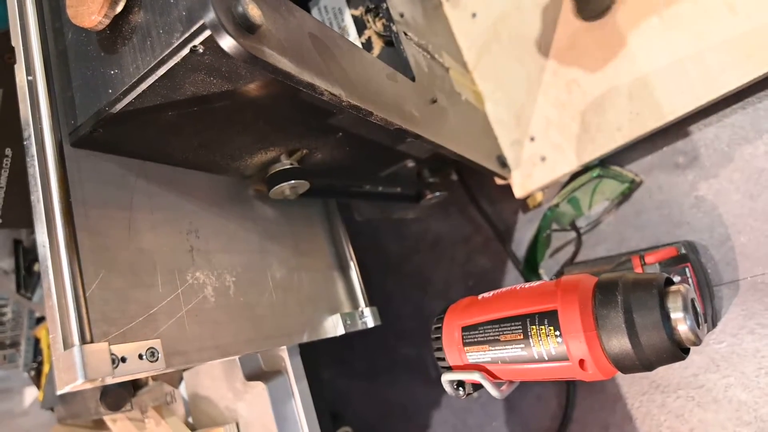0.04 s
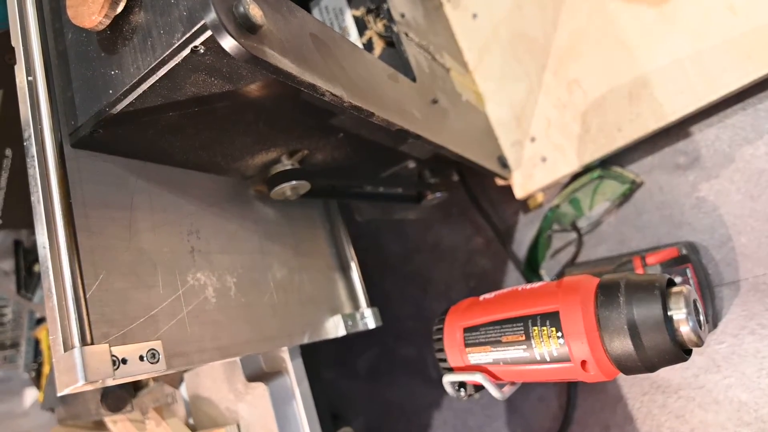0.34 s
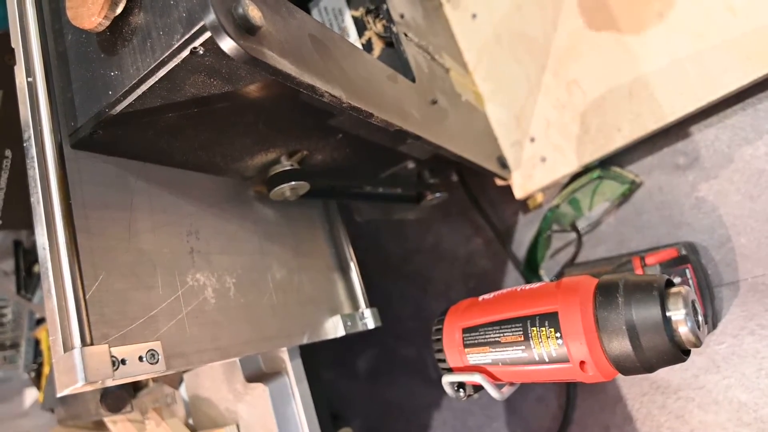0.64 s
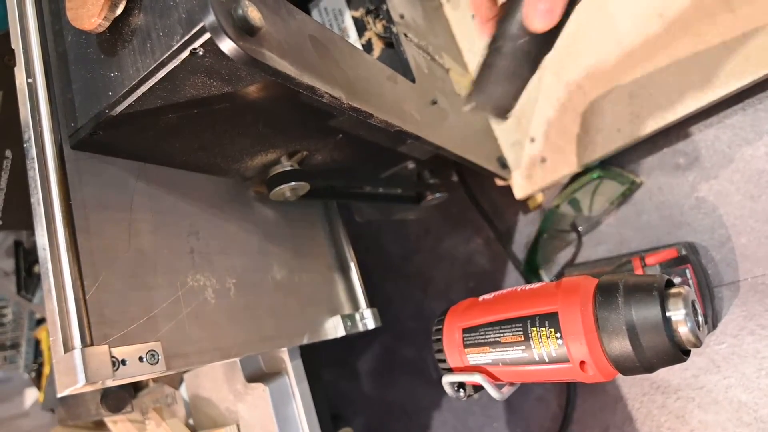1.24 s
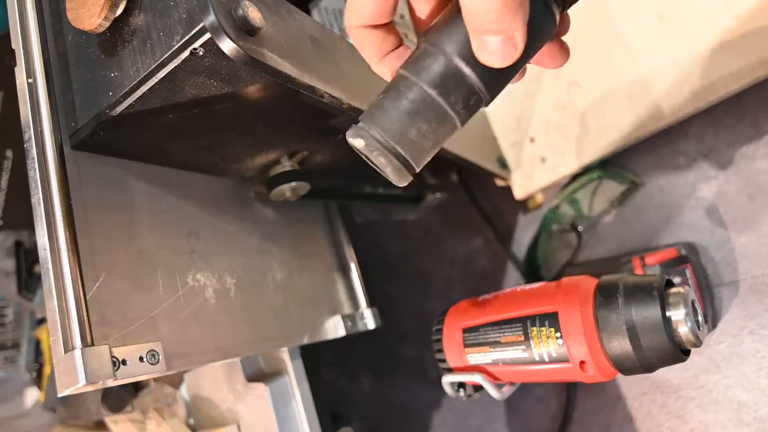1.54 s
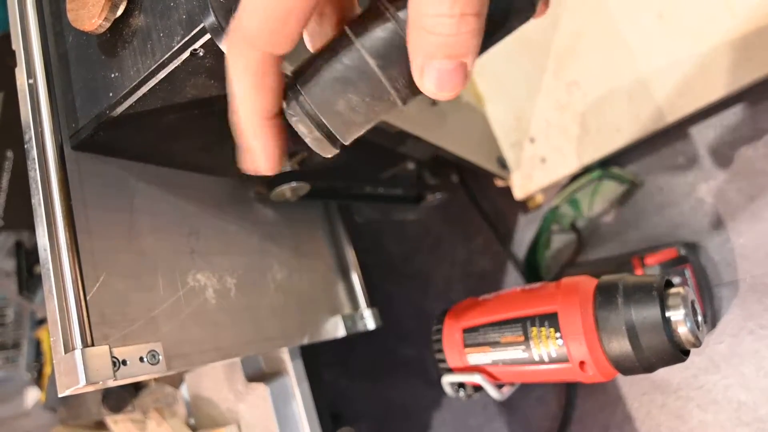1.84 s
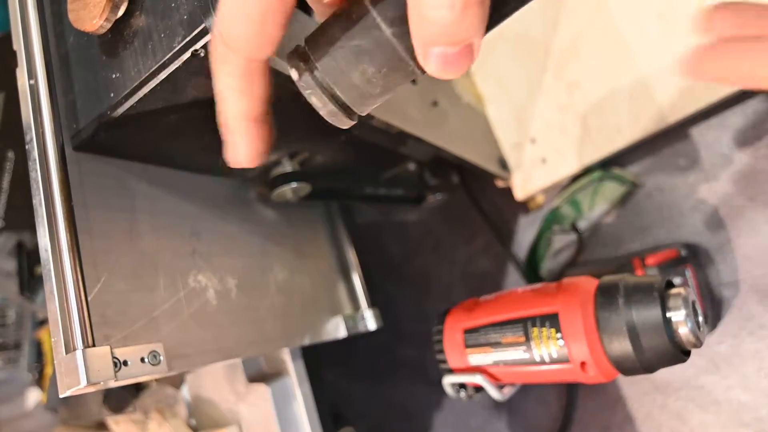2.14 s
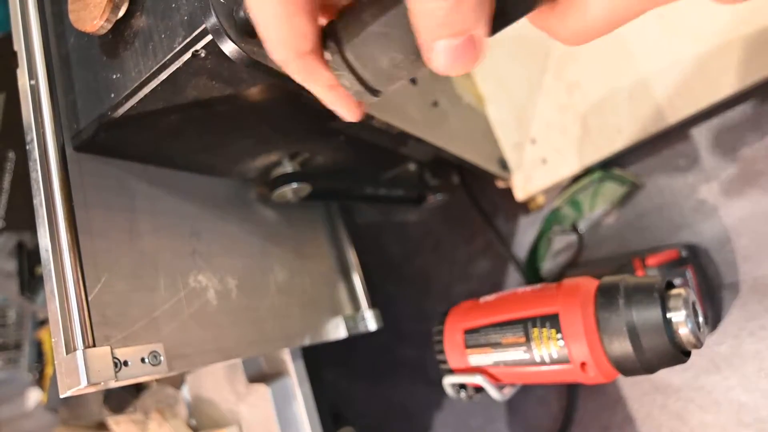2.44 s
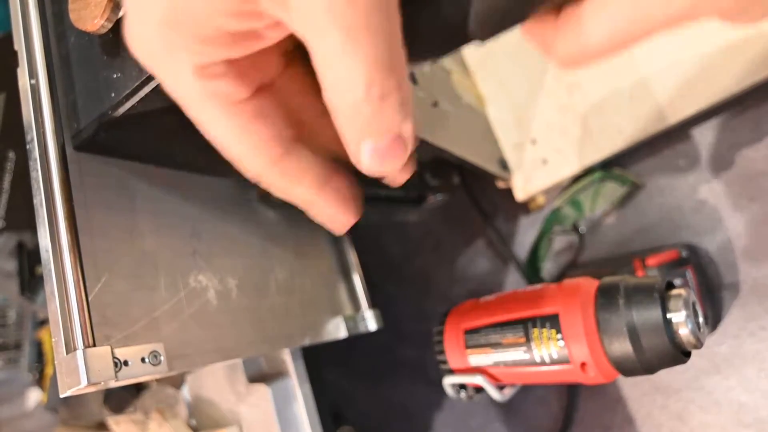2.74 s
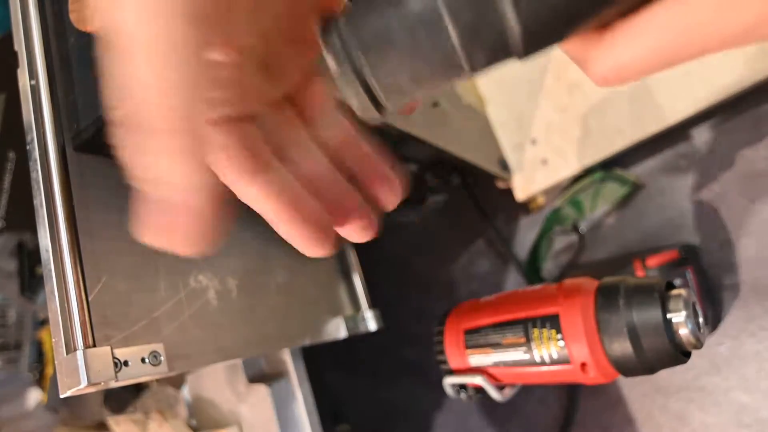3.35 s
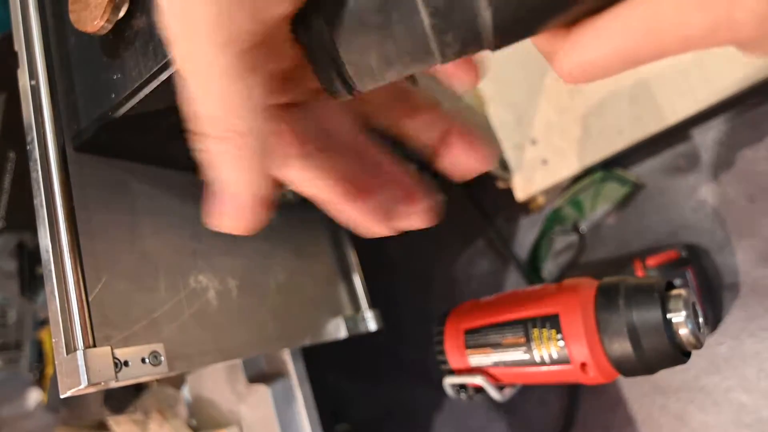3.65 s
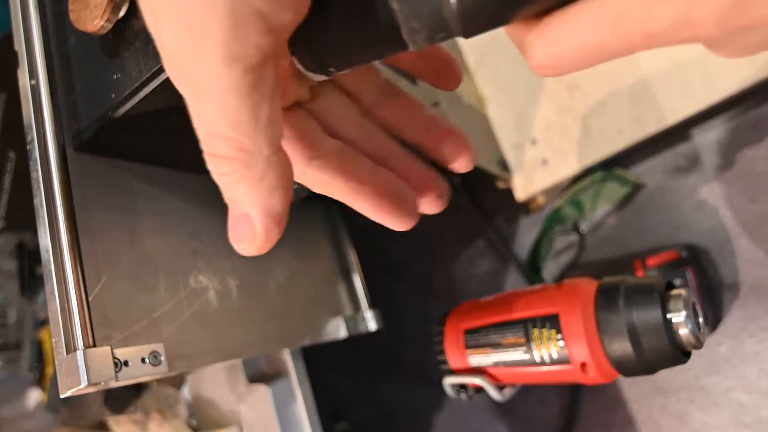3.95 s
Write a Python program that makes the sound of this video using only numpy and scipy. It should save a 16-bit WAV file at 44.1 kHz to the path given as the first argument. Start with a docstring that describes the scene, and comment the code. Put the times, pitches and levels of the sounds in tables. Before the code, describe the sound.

A dust extractor hose sucks air with a hollow rush over a faint machine drone. From about 0.6 seconds a thin, breathy whistle joins, and the rush shifts in tone as the nozzle comes closer. From 2 seconds fingers thin it to a hiss, nearly stopping it at 2.8. Until 4 seconds a palm chokes and frees it in quick bursts, with a few soft gusts on the microphone.

```python
"""A dust extractor sucks air through its hose nozzle: a hollow roar, with the machine droning faintly.
From about 0.6 s the air whistles at the rim, the nozzle is lifted and gusts start to buffet the
microphone. By 1.6 s the nozzle hangs over a steel table, whose echo colours the rush; then it comes close.
Fingers, then a palm, choke and free the opening: the roar thins to a hiss, nearly stops and bursts back."""
import sys
import numpy as np
from scipy import signal
from scipy.fft import rfft, irfft
from scipy.io import wavfile
from scipy.ndimage import map_coordinates

SR = 44100
rng = np.random.default_rng(int(sys.argv[2]) if len(sys.argv) > 2 else 0)


def waveform_to_disk(signal):
    """Save audio, clipped to [-1, 1], as 16-bit WAV at the path in sys.argv[1]."""
    frames = np.transpose(np.atleast_2d(signal))
    scaled = np.clip(frames, -1, 1) * 32767
    samples = np.round(scaled).astype(np.int16)
    wavfile.write(sys.argv[1], SR, samples)


N = 176400
T = np.arange(N) / SR
HZ = np.maximum(np.arange(N // 2 + 1) * SR / N, 1)

# how loud the rushing air is in four bands: t/s, bass/dB, middle/dB, treble/dB, top/dB
AIR_LEVELS = [(0.0, -38, -33, -25, -30), (0.12, -45.5, -33, -26, -33), (0.38, -42, -33.5, -28.5, -33),
              (0.54, -40.5, -33.5, -28, -29.5), (0.6, -41, -34.5, -38.5, -40),
              (0.73, -34.5, -34.5, -31, -36.5), (0.875, -33.5, -26.5, -30, -38),
              (0.895, -27.5, -23, -23.5, -31.5), (0.96, -39.5, -30, -28.0, -31),
              (1.04, -36, -31.5, -26, -27.5), (1.1, -38, -34, -34.5, -39), (1.3, -35, -31, -32.5, -35.5),
              (1.68, -33.5, -26, -31.5, -33), (1.858, -32, -27, -31, -37),
              (1.899, -34.5, -27.5, -27.5, -24.5), (1.98, -39.5, -38, -28.0, -32),
              (2.08, -39, -41, -29.5, -27), (2.114, -39, -30, -25.5, -29), (2.135, -45, -39.5, -40, -37),
              (2.185, -41.5, -36.0, -35.5, -43), (2.224, -35, -33, -31, -26.5),
              (2.251, -45, -34, -23.5, -24), (2.285, -68, -50.5, -39.5, -36), (2.37, -62, -48, -33, -26),
              (2.485, -51, -46, -31, -28), (2.508, -43, -29.5, -25.5, -24.5),
              (2.535, -51.0, -41.5, -35.5, -44), (2.59, -47, -36.5, -30, -38),
              (2.628, -43, -36.5, -24.5, -25), (2.66, -62, -57, -43, -49), (2.71, -60, -58, -48, -54),
              (2.757, -40.5, -39.5, -41, -29), (2.805, -50, -69, -72, -48), (2.87, -51, -68, -70, -63),
              (2.895, -41, -40, -40, -29), (2.919, -42, -32.5, -27.5, -27.5), (2.98, -33, -34.5, -36, -33),
              (3.02, -37, -30, -26.5, -26.5), (3.09, -38, -34.5, -38.5, -37),
              (3.124, -34.5, -28.5, -23, -22.5), (3.138, -60, -51, -48, -41), (3.17, -66, -38, -35, -33),
              (3.185, -47, -41.0, -44, -42), (3.21, -33.5, -34.5, -31.5, -31),
              (3.27, -33, -25, -26.5, -25.5), (3.291, -48, -48, -37, -34), (3.318, -50, -45, -41.5, -37),
              (3.333, -46, -32.5, -27.5, -38), (3.347, -39, -28, -31, -18.5), (3.365, -39, -34, -35.5, -44),
              (3.44, -35, -30.5, -42, -36), (3.459, -33.5, -22.5, -20.5, -26),
              (3.479, -42.5, -47, -39, -30), (3.52, -37, -32, -30, -31.5), (3.6, -31.5, -28, -30, -27.5),
              (3.679, -49.5, -29, -27.5, -31), (3.715, -41, -39, -43, -40.5), (3.75, -46.5, -34, -38, -39),
              (3.781, -41, -27, -25, -22), (3.801, -47, -28.5, -31, -22), (3.825, -65, -55, -45, -41),
              (3.862, -74, -52, -40, -35), (3.884, -42, -26.5, -25, -25), (3.948, -45.5, -27, -27, -29),
              (3.969, -68, -42, -36.5, -32.5), (4.0, -71.5, -45, -47, -43.5)]
# the tone colour of each band: f/Hz, level/dB
BASS_COLOUR = [(70, -25), (125, -8), (180, 2.5), (260, 3), (420, -0.5), (1000, -1.5), (1600, -12.5)]
MIDDLE_COLOUR = [(500, -17), (850, -4), (1400, -1), (1950, 2), (2700, -2.5), (3600, -6.5), (7000, -35)]
TREBLE_COLOUR = [(1900, -22), (2700, -4.5), (3400, 1), (5000, 3), (8500, -2), (10500, -5), (15000, -16.5)]
TOP_COLOUR = [(4500, -8.5), (7500, 0.5), (9000, 2.5), (11500, 2), (13800, 5.5), (16000, 0.5)]
# pitches at which the hose end and its surroundings ring: f/Hz, width/Hz, gain/dB
RING_FAR_OFF = [(283, 83, 10.5), (409, 89, 8.5), (610, 45, 8.5), (808, 37, 8), (1250, 160, 2.5),
                (1827, 87, 6.5), (2720, 330, 1.5), (3110, 69, 4), (3604, 90, 5.5)]
RING_OVER_TABLE = [(460, 45, 7), (670, 33, 7), (1425, 102, 7.5), (1594, 80, 5), (2150, 120, 3),
                   (3050, 120, 4.5), (5280, 76, 3)]
RING_NEAR_PALM = [(275, 51, -13.5), (353, 85, 4.5), (890, 55, 3), (1156, 38, 4.5), (1390, 57, 6),
                  (1953, 220, 6.5), (2560, 190, 3), (3070, 240, -0.5)]
# stereo width, what differs between the ears against what they share: f/Hz, level/dB
STEREO_WIDTH = [(60, -21), (250, -27), (700, -14), (1400, -16.5), (2200, -9.5), (4000, -4.5), (8000, -0.5)]
# where the hiss sits: t/s, left minus right/dB
HISS_PAN = [(1.3, 0.5), (2.2, 2), (2.9, 0)]
# how late the echo off the table comes as the nozzle moves: t/s, lag/ms
TABLE_LAG = [(0, 1.622), (0.6, 1.686), (0.85, 1.464), (1.28, 1.84), (1.55, 2.908), (4, 3.11)]
# how strong that echo is: t/s, share (0 to 1)
TABLE_SHARE = [(0, 0.61), (1.35, 0.18), (1.8, 0.26)]
# the machine's tones, then the colour of its noise: f/Hz, level/dB
MACHINE_TONES = [(412, -61.5), (732, -63.5), (1190, -61)]
MACHINE_COLOUR = [(70, -9.5), (200, -10.5), (2500, -9.5), (16000, -23.5)]
# whistles and hoots at the rim and between the fingers:
# start/s, end/s, first f/Hz, last f/Hz, width/Hz, level/dB
RIM_WHISTLES = [ (0.57, 0.89, 8050, 7700, 600, -33.5), (0.564, 0.854, 9050, 8900, 370, -35.5),
                (1.081, 1.874, 7820, 7670, 540, -33.5), (1.082, 1.875, 8950, 8720, 1000, -37.5),
                (1.94, 2.106, 13940, 13800, 830, -26), (2.12, 2.235, 9370, 9100, 660, -33),
                (2.269, 2.514, 13840, 13850, 320, -35), (2.35, 2.496, 8450, 8480, 1200, -30.5),
                (2.545, 2.594, 9660, 9750, 710, -29.5), (2.748, 2.769, 682, 707, 67, -40.5),
                (2.892, 2.932, 13600, 13600, 990, -27), (2.93, 3.008, 10450, 9960, 900, -27.5),
                (3.066, 3.089, 9300, 7730, 1500, -25), (3.375, 3.433, 9030, 8900, 850, -29.5),
                (3.709, 3.784, 9220, 9050, 500, -34)]
# hollow-sounding peaks that slide through the rush: start/s, end/s, first f/Hz, last f/Hz, gain/dB
SWEEPING_PEAKS = [ (0.757, 1.002, 1440, 1310, 6), (1.233, 1.348, 1050, 980, 10.5),
                  (1.33, 1.566, 870, 730, 5.5), (1.36, 1.57, 2080, 1790, 5.5),
                  (2.88, 2.935, 2400, 2360, 10), (2.955, 3.058, 4480, 4970, 5.5),
                  (3.32, 3.45, 2200, 1930, 4), (3.86, 4.0, 1980, 2080, 6.5), (3.92, 3.973, 2600, 2650, 10)]
# gusts on the microphone: t/s, half length/s, level/dB
GUST_HITS = [(0.907, 0.022, -53), (1.922, 0.017, -49), (3.13, 0.015, -45), (3.217, 0.038, -48),
             (3.464, 0.011, -38.5), (3.526, .02, -50)]
# their tone colour: f/Hz, level/dB
GUST_COLOUR = [(25, -15), (60, -7), (110, -6), (160, -18), (600, -50)]


def from_db(db):
    """Turn decibels into a number to multiply by."""
    return 10 ** (np.asarray(db) / 20)


def rms_one(x):
    """Scale a sound so that its average (RMS) level is one."""
    return x / np.sqrt(np.mean(x ** 2) + 1e-20)


def in_time(rows):
    """Join a table's points with straight lines: one curve for each column after the time."""
    times, *columns = np.transpose(rows)
    return [np.interp(T, times, column) for column in columns]


def colour(points):
    """The gain at every frequency from a colour table, fading away below its first point."""
    hz, db = np.transpose(points)
    return from_db(np.interp(np.log(HZ), np.log(hz), db)) * np.minimum(HZ / hz[0], 1) ** 2


def ring(peaks):
    """The gain at every frequency from a set of rounded peaks and dips."""
    return from_db(sum(db / (1 + (2 * (HZ - hz) / width) ** 2) for hz, width, db in peaks))


def wobble(rate_hz):
    """A random wiggle of size one, mostly slower than the given rate."""
    return rms_one(irfft(rfft(rng.standard_normal(N)) / (1 + (HZ / rate_hz) ** 2), N))


def wide_noise(gain):
    """Stereo noise, narrow in the bass and wide in the treble; several colours share the same noise."""
    mid, side = rfft(rng.standard_normal((2, N)))
    mid = irfft(mid * gain, N)
    side = irfft(side * colour(STEREO_WIDTH) * gain, N)
    return np.array([mid + side, mid - side]) / mid.std(axis=-1, keepdims=True)


def wavering_tone(hz, width_hz):
    """An unsteady tone: a narrow band of noise around a pitch that may move."""
    decay = np.exp(-2 * np.pi * abs(width_hz) * .7 / SR)
    white = rng.standard_normal((2, SR * (1 + len(hz) // SR)))
    sway = signal.lfilter([1], [1, -2 * decay, decay ** 2], white[:, :len(hz)])
    phase = 2 * np.pi * np.cumsum(hz) / SR
    return rms_one(sway[0] * np.cos(phase) + sway[1] * np.sin(phase))


def delayed(x, lag_ms):
    """A sound heard a little later, by a lag that may change."""
    return map_coordinates(x, [np.arange(N) - lag_ms * SR / 1000], order=1)


def soft_gate(start, end, fade_s=0.018):
    """One between two times and zero outside, with short fades."""
    return np.clip(np.minimum(T - start, end - T) / fade_s + .5, 0, 1)


def suction(flutter_db=1.19, roar_pan_db=-0.5):
    """Swirling air at the nozzle; it rings differently far off, in mid-air, over the table and close by."""
    lifted = np.interp(T, (0.64, 1.76), (0, 1))
    arrived = np.interp(T, (1.34, 1.62), (0, 1))
    close = np.interp(T, (1.8, 2.84), (0, 1))
    place_shares = np.array([1 - lifted, lifted - arrived, arrived - close, close])
    place_rings = np.array([ring(RING_FAR_OFF), np.ones_like(HZ),
                            ring(RING_OVER_TABLE), ring(RING_NEAR_PALM)])
    flutter = flutter_db * wobble(rate_hz=160)   # the swirls shake all four bands together
    roar_pan = np.full(N, roar_pan_db)
    hiss_pan, = in_time(HISS_PAN)
    bands = [(BASS_COLOUR, roar_pan), (MIDDLE_COLOUR, roar_pan),
             (TREBLE_COLOUR, hiss_pan), (TOP_COLOUR, hiss_pan)]
    out = 0
    for (shape, pan), level in zip(bands, in_time(AIR_LEVELS)):
        air_by_place = wide_noise(colour(shape) * place_rings)
        air = (place_shares * air_by_place).sum(axis=1)
        out = out + air * from_db(level + flutter) * from_db([pan / 2, -pan / 2])
    return out


def table_echo(x, cutoff_hz=1360):
    """A dull echo bounces twice off the table; its changing lag sweeps peaks and dips through the rush."""
    lag_ms, = in_time(TABLE_LAG)
    share, = in_time(TABLE_SHARE)
    dull = irfft(rfft(x) / (1 + (HZ / cutoff_hz) ** 2), N)
    return np.array([share * delayed(ear, lag_ms) + .5 * share ** 2 * delayed(ear, 2 * lag_ms)
                     for ear in dull])


def small_echoes(x, count=8, share=0.17, ear_lag_ms=0.039):
    """The machine and bench bounce back the treble; each path grows or shrinks as the nozzle moves."""
    table_ms, = in_time(TABLE_LAG)
    moved_ms = table_ms - table_ms.mean()
    left, right = irfft(rfft(x) * HZ / np.hypot(HZ, 1200), N)
    out = 0
    for distance, stretch, side in rng.uniform(-1, 1, (count, 3)):
        lag_ms = np.interp(distance, (-1, 1), (2.5, 14)) + stretch * moved_ms
        side_ms = side * ear_lag_ms
        out = out + np.array([delayed(left, lag_ms + side_ms), delayed(right, lag_ms - side_ms)])
    return share * out


def room_echo(x, level_db=-22.5, die_away_s=0.47):
    """The room's many echoes blur into a short tail, different at each ear."""
    t = T[:SR // 2]
    tail = rng.standard_normal((2, len(t))) * from_db(-60 * t / die_away_s) * (t > .004)
    tail = rms_one(tail) / np.sqrt(len(t))
    return from_db(level_db) * signal.fftconvolve(x, tail, axes=1)[:, :N]


def extractor_drone(noise_db=-51.5):
    """The distant machine hums a few unsteady tones over a dull noise."""
    tones = sum(from_db(db) * wavering_tone(np.full(N, hz), width_hz=23) for hz, db in MACHINE_TONES)
    return tones + from_db(noise_db) * wide_noise(colour(MACHINE_COLOUR))


def rim_whistles(waver_db=2.5):
    """Air passing an edge makes a breathy whistle, which lasts while the gap keeps its shape."""
    out = np.zeros((2, N))
    for start, end, first_hz, last_hz, width_hz, db in RIM_WHISTLES:
        gate = soft_gate(start, end)
        on = gate > 0
        pitch = np.interp(T[on], [start, end], [first_hz, last_hz])
        for ear in out:
            ear[on] += from_db(db) * gate[on] * wavering_tone(pitch, width_hz)
    return out * from_db(waver_db * wobble(rate_hz=14))


def sweeping_peaks(x, sharpness=20):
    """Hollow-sounding peaks slide through the rush as the nozzle moves and its echo shifts."""
    out = x
    for start, end, first_hz, last_hz, db in SWEEPING_PEAKS:
        pitch = np.interp(T, [start, end], [first_hz, last_hz])
        width_hz = first_hz / sharpness
        decay = np.exp(-np.pi * width_hz / SR)
        # shift the pitch down to 0 Hz, smooth away the rest, then shift it back
        shift = np.exp(2j * np.pi * np.cumsum(pitch) / SR)
        band = 2 * np.real(shift * signal.lfilter([1 - decay], [1, -decay], x / shift))
        out = out + (from_db(db) - 1) * soft_gate(start, end) * band
    return out


def gusts():
    """Puffs of air hit the microphone with soft, low thumps."""
    swell = sum(from_db(db) * np.exp(-.5 * ((T - peak_s) / half_s) ** 2)
                for peak_s, half_s, db in GUST_HITS)
    return swell * wide_noise(colour(GUST_COLOUR))


def scene():
    """Add up the nozzle, its echoes, the gusts and the machine."""
    nozzle = sweeping_peaks(suction()) + rim_whistles()
    echoes = table_echo(nozzle) + small_echoes(nozzle) + room_echo(nozzle)
    return nozzle + echoes + gusts() + extractor_drone()


def record(dry):
    """Cut away the very highest treble, above 15950 Hz."""
    low_pass = signal.ellip(12, .1, 80, 15950, fs=SR, output="sos")
    return signal.sosfilt(low_pass, dry, axis=-1)


dry = scene()
out = record(dry)
waveform_to_disk(out)
```